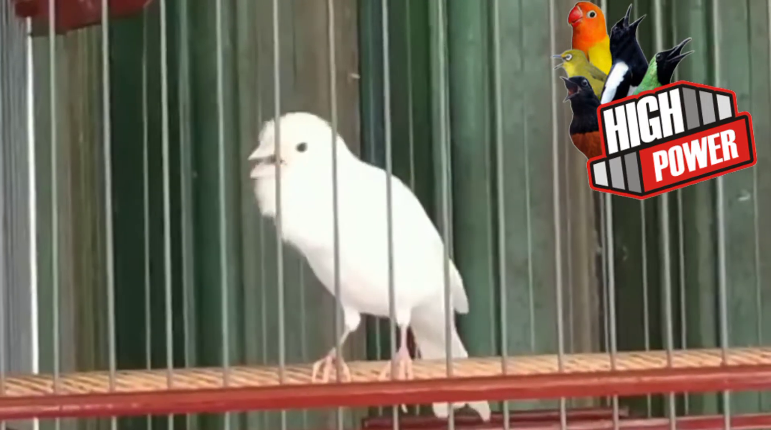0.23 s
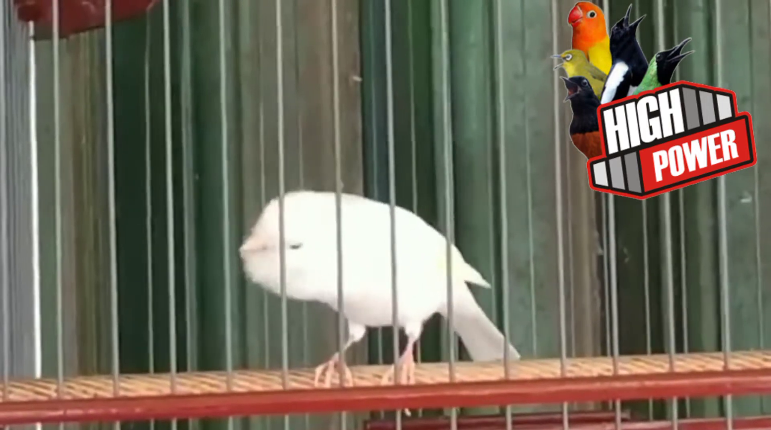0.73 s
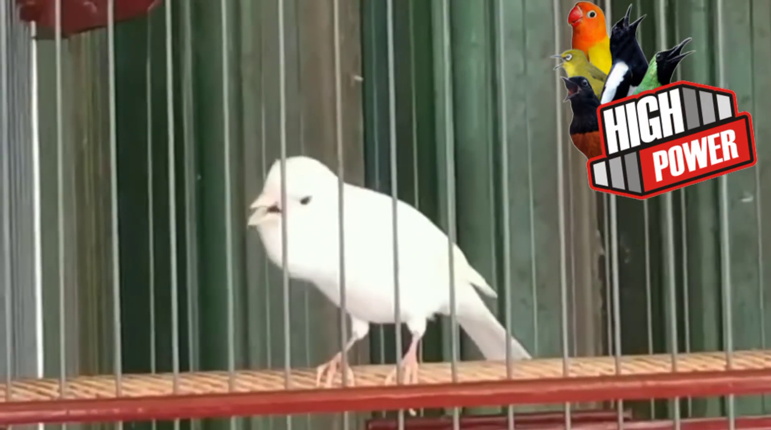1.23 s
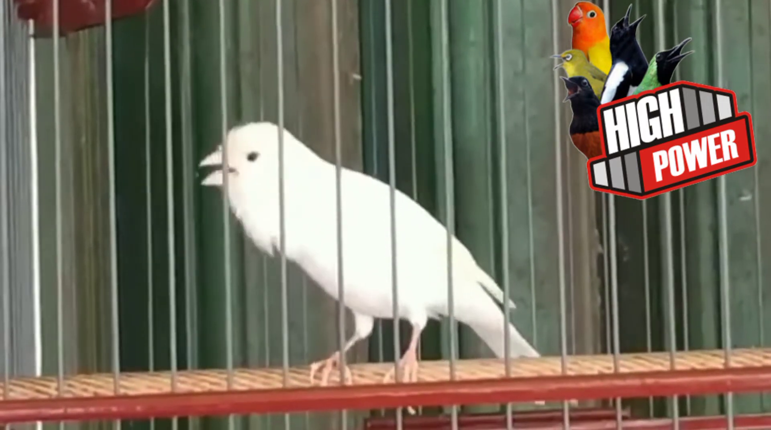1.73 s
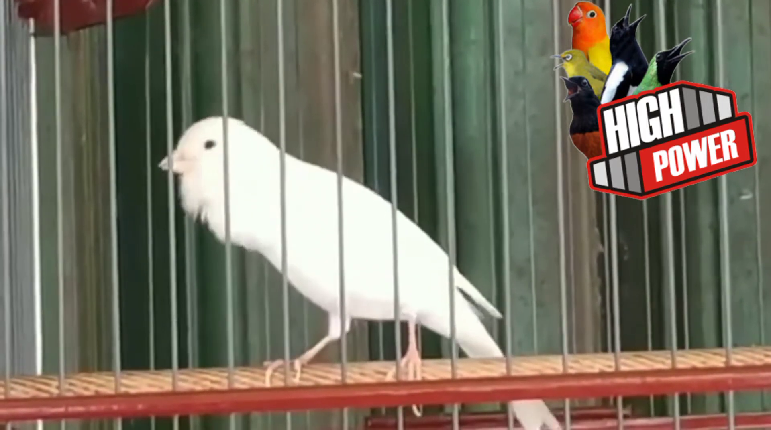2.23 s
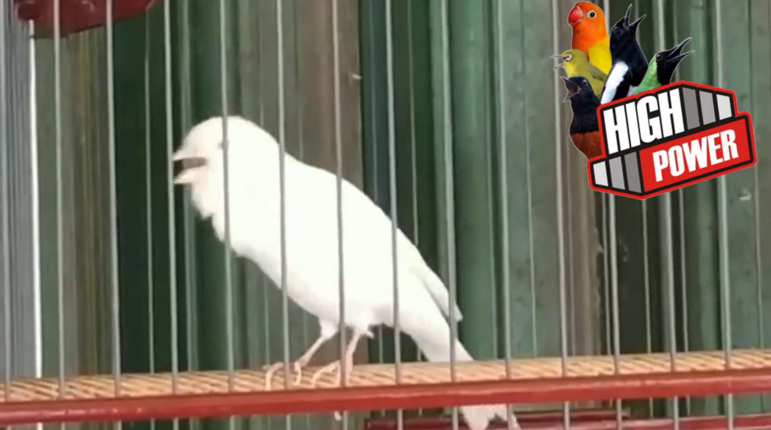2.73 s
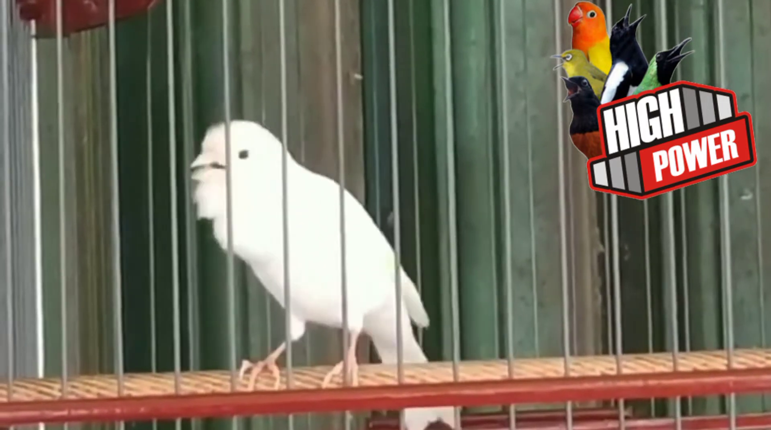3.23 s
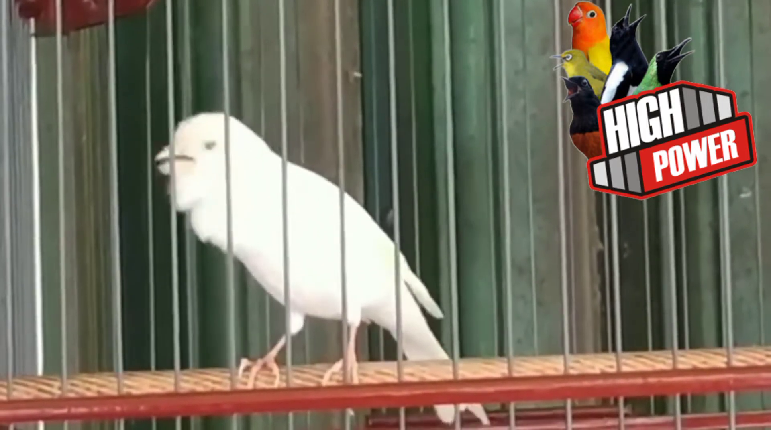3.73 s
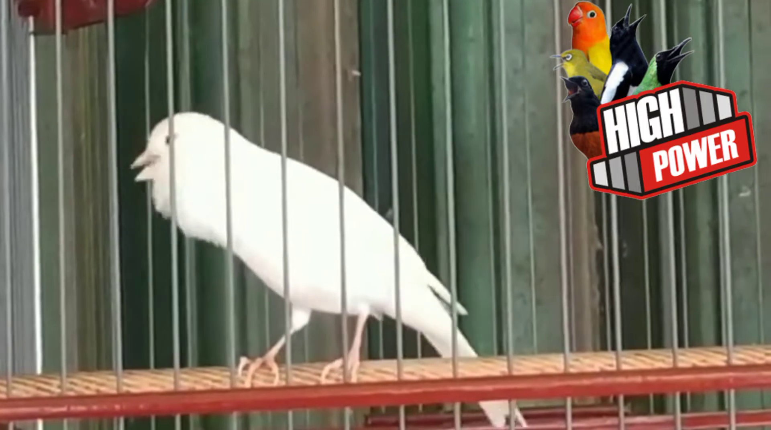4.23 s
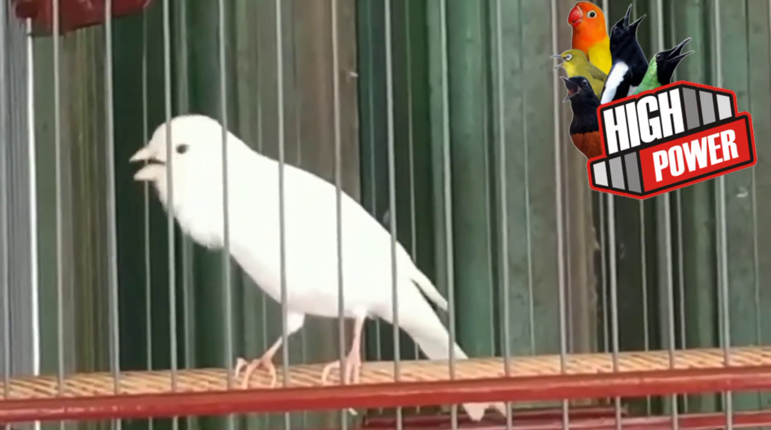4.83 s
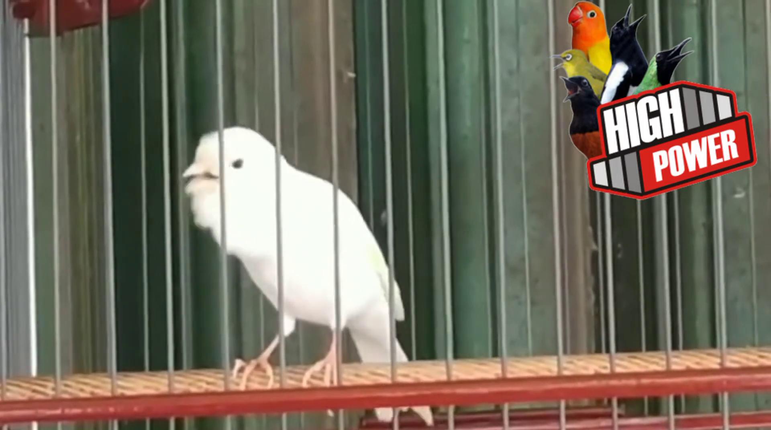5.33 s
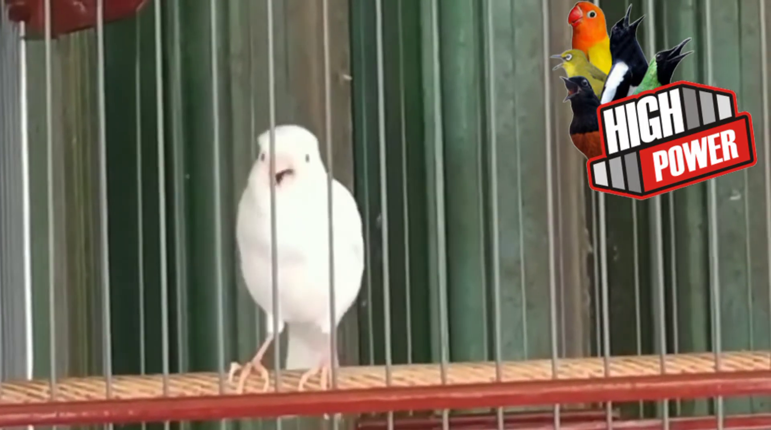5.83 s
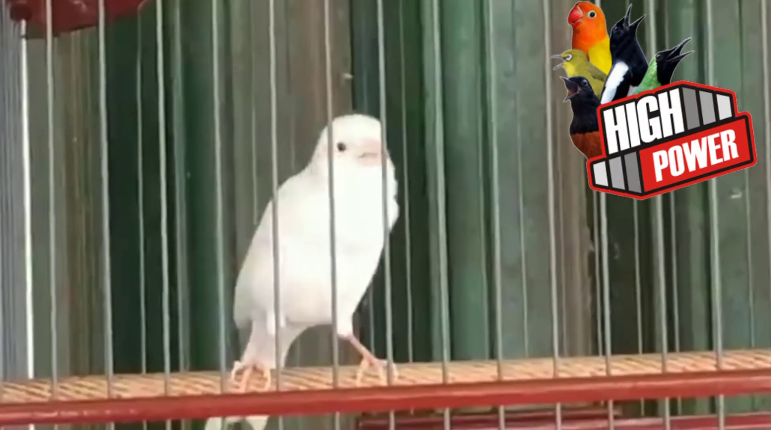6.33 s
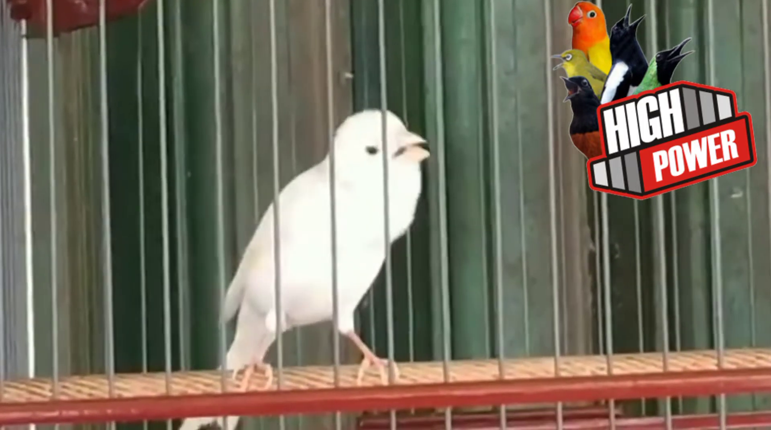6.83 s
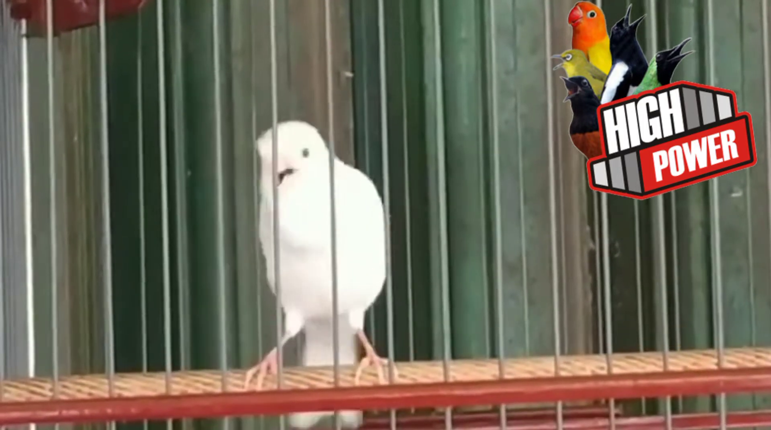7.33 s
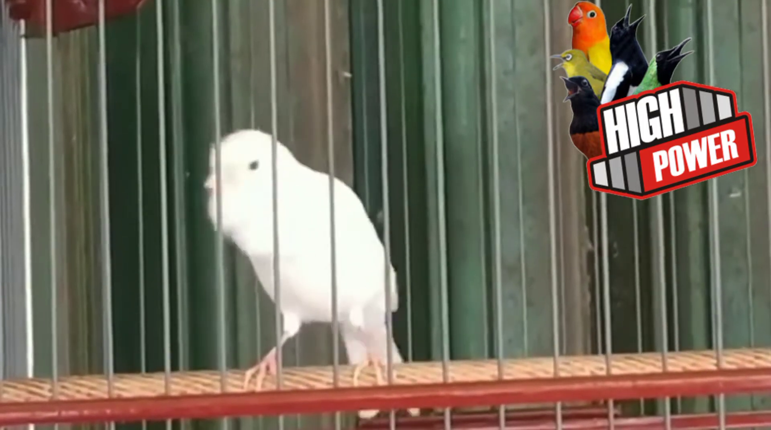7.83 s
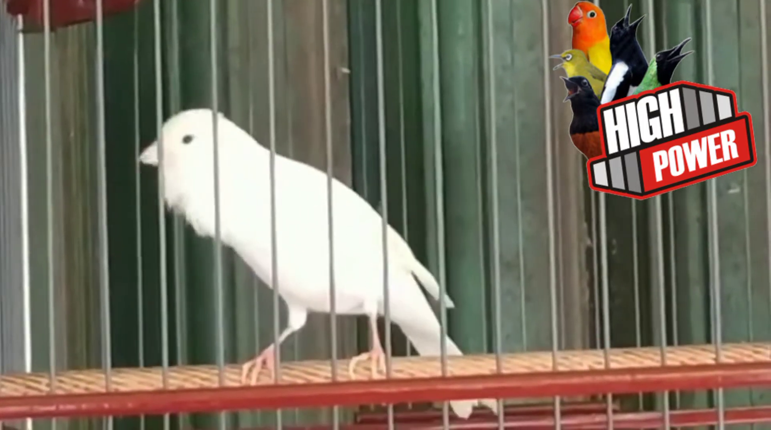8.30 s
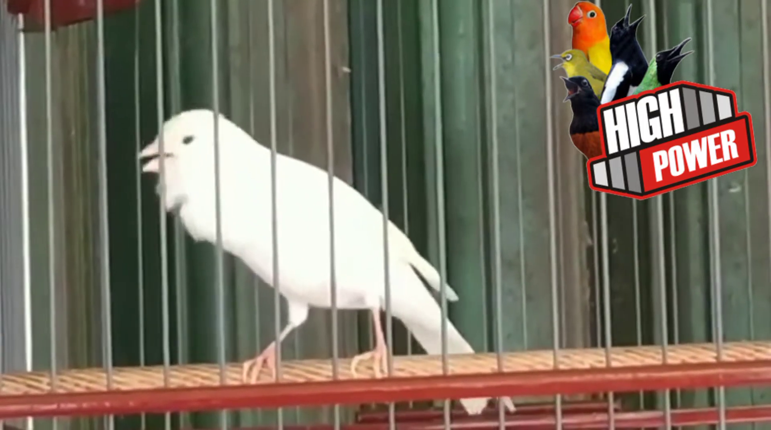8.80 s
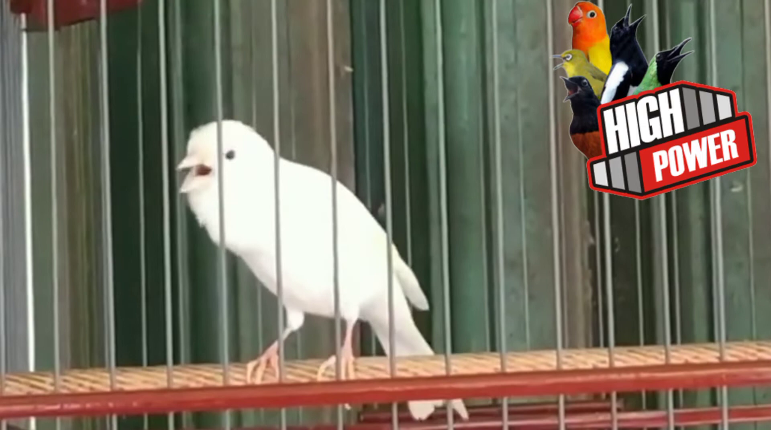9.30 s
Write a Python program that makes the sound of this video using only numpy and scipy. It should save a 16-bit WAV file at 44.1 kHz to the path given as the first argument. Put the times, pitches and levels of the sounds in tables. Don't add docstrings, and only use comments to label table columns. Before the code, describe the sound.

Bright, nearly pure canary whistles dominate, captured close in stereo with short hard-room reverberation and slight phone-recording coarseness. Each phrase repeats one syllable: falling slides, longer falls, rises, swooping drops, a rapid rolling trill, dry chatter, chips, then long falls again. Gaps are only brief. Behind it are faint rising replies and small chirps from other birds, over a steady, low traffic rumble that eases near the end.

```python
import sys
import numpy as np
from scipy import signal
from scipy.fft import rfft, irfft, next_fast_len
from scipy.io import wavfile
from scipy.ndimage import uniform_filter1d

SR = 44100
rng = np.random.default_rng(int(sys.argv[2]) if len(sys.argv) > 2 else 0)


def magnitude_from_level(level_db):
    exponent = np.asarray(level_db, float) / 20
    return 10 ** exponent


def wrap_up_sound(samples):
    columns = np.atleast_2d(samples).T
    tamed = np.clip(columns, -1, 1)
    steps = np.round(tamed * 32767).astype(np.int16)
    wavfile.write(sys.argv[1], SR, steps)


N = 421596


def on_log(table, hz):
    f, v = np.transpose(table)
    return np.interp(np.log(np.maximum(hz, 1)), np.log(f), v)


def walk(rate_hz, size=N):
    hold = int(SR / rate_hz)
    steps = np.repeat(rng.standard_normal(size // hold + 1), hold)
    return 1.25 * uniform_filter1d(uniform_filter1d(steps, hold), hold)[:size]


def wander(x, depth_db, size=4096):
    _, _, z = signal.stft(x, SR, nperseg=size)
    field = rng.standard_normal(z.shape[1:])
    field = uniform_filter1d(uniform_filter1d(field, size=2, axis=0), size=10, axis=1)
    gain = magnitude_from_level(depth_db * field / field.std())
    gain = gain / np.sqrt(np.mean(gain ** 2))
    return signal.istft(z * gain, SR, nperseg=size)[1][:, :N]


# t/s, level/dB
TRAFFIC = [
    (0.3, -37.5),
    (3.31, -39),
    (5.32, -38.5),
    (9.07, -44.5),
    (9.4, -42),
]
# f/Hz, level/dB per Hz
RUMBLE = [(12, -53), (20, -7.5), (38, 0), (59, -4), (102, 0.5), (157, -1.5), (179, -3.5), (226, -25.5),
          (260, -18), (340, -56.5), (570, -120)]
# f/Hz, level/dB per Hz
AIR = [(120, -26), (200, -2.5), (228, -4), (460, -9), (1320, -16), (1520, -11.5), (2200, -15),
       (2860, -34.5), (4840, -120)]
# f/Hz, correlation
LIKENESS = [(60, .992), (125, .975), (250, .75), (500, .35), (1500, .2)]


def background():
    air_db, gust_db = -11, 1.5
    load_db = np.interp(np.arange(N) / SR, *np.transpose(TRAFFIC)) + 1.1
    hz = np.arange(N // 2 + 1) * SR / N
    like = np.clip(on_log(LIKENESS, hz), 0, 1)
    out = 0
    for table, db, lo_hz, top_hz in [(RUMBLE, 0, 40, 220), (AIR, air_db, 250, 1200)]:
        mid, side = rfft(rng.standard_normal((2, N))) * magnitude_from_level(on_log(table, hz))
        mid, side = mid * np.sqrt(1 + like), side * np.sqrt(1 - like)
        in_band = (hz > lo_hz) & (hz < top_hz)
        rms = np.sqrt(2 * np.sum(np.abs(mid[in_band]) ** 2)) / N
        ports = irfft(np.array([mid + side, mid - side]), N) / rms
        out = out + ports * magnitude_from_level(load_db + db + gust_db * walk(6))
    return wander(out, depth_db=3.5)


# multiple, level/dB
OVERTONES = [(2, -17), (3, -19.5), (4, -23.5)]
# f/Hz, gain/dB
UPPER = [(4000, -17), (6000, -21), (7600, -6), (9000, -2.5), (10500, 3), (12500, -0.5), (13500, -10)]


def whistle(track, note, wobble, edge_s=0.0012):
    s, hz, db = note
    i = np.arange(max(int(s[0] * SR), 0), min(int(s[-1] * SR), N))
    t = i / SR
    hz = np.interp(t, s, hz) * wobble[i]
    phase = 2 * np.pi * np.cumsum(hz) / SR
    wave = np.sin(phase)
    for k, k_db in OVERTONES:
        below_nyquist = k * hz < .45 * SR
        wave += magnitude_from_level(k_db + on_log(UPPER, k * hz)) * below_nyquist * np.sin(k * phase)
    edge = np.clip(np.minimum(t - s[0], s[-1] - t) / edge_s, 0, 1)
    track[i] += wave * magnitude_from_level(np.interp(t, s, db)) * np.sin(np.pi / 2 * edge) ** 2


def glide(from_hz, to_hz, bend, size):
    along = np.expm1(-bend * np.linspace(0, 1, size)) / np.expm1(-bend)
    return from_hz + (to_hz - from_hz) * along


def aviary(count=260):
    track = np.zeros(N)
    steady = np.ones(N)
    for at, start, fall, length, loud in rng.random((count, 5)):
        s = at * N / SR + np.array([0, 0.033 + .05 * length])
        hz = (2900 + 2600 * start ** 2) * np.array([1, 1.1 - 0.46 * fall])
        whistle(track, (s, hz, np.full(2, -44 + 8 * loud)), steady, edge_s=0.0087)
    return track


# t/s, length/s, start f/Hz, end f/Hz, level/dB
ANSWERS = [
    (2.2, .2, 4330, 5000, -28),
    (3.713, 0.15, 2885, 3620, -33.5),
    (4.0, 0.11, 2900, 3350, -32.5),
    (4.3, .08, 2900, 3183, -35),
    (7.76, 0.17, 3490, 4050, -25),
    (8.03, .16, 3520, 3758, -25.5),
    (8.268, 0.16, 3527, 3704, -23.5),
    (9.036, 0.13, 4470, 4950, -27),
]
# t/s, start f/Hz, end f/Hz, level/dB
FAR_CHIRPS = [
    (8.41, 3300, 2400, -41),
    (8.54, 3400, 2300, -41),
    (8.72, 3800, 2900, -38),
    (8.80, 3600, 2300, -39),
    (8.98, 3900, 2700, -37),
    (9.08, 3400, 2200, -40),
    (9.33, 3600, 2400, -40),
]


def far_bird():
    track = np.zeros(N)
    wobble = 1 + .008 * walk(120)
    for s, length, from_hz, to_hz, db in ANSWERS:
        hz = glide(from_hz, to_hz, bend=4, size=24)
        whistle(track, (np.linspace(s, s + length, len(hz)), hz, db + 0 * hz), wobble, edge_s=.02)
    hoarse = 1 + .05 * walk(400)
    for s, from_hz, to_hz, db in FAR_CHIRPS:
        note = np.array([s, s + 0.066]), np.array([from_hz, to_hz]), np.array([db + 10, db + 3.5])
        whistle(track, note, hoarse, edge_s=0.0025)
    return track


def breath():
    low_pass = signal.butter(4, 900, fs=SR, output="sos")
    rush = signal.sosfilt(low_pass, rng.standard_normal(N))
    return magnitude_from_level(2.5 * walk(250)) + magnitude_from_level(-21) * rush / rush.std()


def syllable(strokes, size=24):
    joint_ms = 2.3
    ends = np.cumsum([0] + [row[0] for row in strokes])
    ms = np.concatenate([np.linspace(a, b, size) for a, b in zip(ends, ends[1:])])
    hz = np.concatenate([glide(a, b, bend + 1e-9, size) for _, a, b, bend, _ in strokes])
    joints = np.ravel([ends[:-1] + joint_ms / 2, ends[1:] - joint_ms / 2], order="F")
    push_db = np.repeat([row[4] for row in strokes], repeats=2)
    return ms, hz, np.interp(ms, joints, push_db)


# length/ms, start f/Hz, end f/Hz, bend, push/dB
SLIDE = [(26.93, 7500, 5800, 0.067, -5.5), (80.7, 5150, 1950, -0.36, -0.5)]
LONG_FALL = [(184.2, 7450, 4150, -.2, -1.5), (31.54, 4150, 2700, 0.12, -1.5)]
RISE = [(16.02, 2100, 2400, 0.55, -4.5), (107, 3100, 5120, .1, -8), (48.6, 5120, 5220, .6, -1.5),
        (49.9, 5220, 5300, 0.27, -5), (15, 4800, 5320, .1, -15.5)]
SCOOP = [(6.09, 4500, 7600, 2, -2), (12.07, 7600, 7400, -0.4, -9.5), (171.1, 7400, 2400, 2.5, -2),
         (25, 2400, 2400, .1, -9)]
FLICK = [(22, 7600, 6300, 0.12, -2)]
ROLL = [(12, 7450, 5900, .1, -2), (13, 5900, 4600, 0.38, -4)]
PIP = [(11, 3300, 3720, 2.9, 7.26)]
CHATTER = [(5.92, 5200, 7300, 0.9, 1), (20.14, 7300, 6500, -2.5, -4.5), (21.86, 5550, 4400, -0.14, -.5),
           (17.4, 4400, 3350, -0.5, -12.5), (12.8, 3300, 1600, -0.37, 1.5)]
CHIP = [(4.88, 5500, 6800, 1.5, -2.5), (14.06, 7400, 5950, -0.64, -7.5), (20.16, 5950, 4700, -0.6, -2.5),
        (57.75, 4700, 1800, 1.32, -1.5)]
LINK = [(45, 7650, 6100, -.3, 1), (33, 6100, 4000, .1, -3)]
# t/s, effort/dB
SLIDE_AT = [(0.038, 0.5), (0.194, 1), (0.351, 0.5), (0.512, 1), (0.669, -1), (0.818, 0.5), (0.973, -0.5)]
FALL_AT = [(1.213, -0.28), (1.472, 0.27), (1.735, -1.5), (2.004, -0.95), (2.288, -1.8)]
RISE_AT = [(2.524, 0), (2.823, 0)]
SCOOP_AT = [(3.07, 0.0026), (3.324, 0.0095), (3.568, 0), (3.821, 0), (4.07, 0), (4.335, 0)]
FLICK_AT = [(4.552, 0)]
ROLL_AT = [(4.6, -1.5), (4.678, 0.5), (4.755, 1), (4.832, 1), (4.907, 1.5), (4.982, 1), (5.062, 1),
           (5.14, 3), (5.217, 2), (5.294, 1.5), (5.371, 1.5), (5.454, 4), (5.535, 4), (5.614, 3.5),
           (5.698, 3), (5.786, 4.5)]
PIP_AT = [(4.611, -6.5), (4.691, -5), (4.769, -5.5), (4.846, -5.5), (4.921, -6), (4.998, -5), (5.074, -4.5),
          (5.155, -4.5), (5.232, -5.5), (5.307, -6.5), (5.388, -6), (5.469, -5.5), (5.552, -4), (5.63, -2),
          (5.715, -2)]
CHATTER_AT = [(5.894, 0.79), (6.004, 0), (6.114, 0.38), (6.224, 1), (6.333, 0), (6.441, 0.87), (6.554, 0),
              (6.662, 0), (6.774, 0.056), (6.884, 0.082), (6.992, 0.58), (7.107, 1)]
CHIP_AT = [(7.214, 2.6), (7.353, 1), (7.491, 1), (7.632, 1.8), (7.773, 0), (7.912, 0), (8.065, 0),
           (8.196, 0.056)]
LINK_AT = [(8.391, 0)]
LAST_FALL_AT = [(8.626, 0.14), (8.9, 1), (9.176, 1), (9.462, 0.76)]
# syllable, beats, lead before beat/ms, first length factor, last length factor, last pitch factor
PHRASES = [(SLIDE, SLIDE_AT, 40, 1.01, 0.94, 1.01), (LONG_FALL, FALL_AT, 158, .78, 1, 0.98),
           (RISE, RISE_AT, 103, 1.01, 1.01, 1), (SCOOP, SCOOP_AT, 58, 0.97, 1.01, 0.98),
           (FLICK, FLICK_AT, 16, 1.1, 1.01, 1.01), (ROLL, ROLL_AT, 23, 1.1, 1.05, 0.94),
           (PIP, PIP_AT, 3.2, 1.3, .85, 0.94), (CHATTER, CHATTER_AT, 42, 1.01, 1, 0.97),
           (CHIP, CHIP_AT, 36, .88, 1.1, 0.93), (LINK, LINK_AT, 65, 1, 1, 1),
           (LONG_FALL, LAST_FALL_AT, 158, 0.99, .96, 0.95)]
# f/Hz, level/dB
THROAT = [(1900, -36.5), (2500, -28), (3100, -15.5), (3800, -9), (5200, -9.5), (5900, -15.5), (6800, -21.5),
          (7500, -16.5)]


def canary():
    pitch_spread, length_spread = .005, .02
    track = np.zeros(N)
    wobble = 1 + 0.00367 * walk(150)
    for strokes, sung, lead_ms, first, last, pitch in PHRASES:
        ms, hz, push_db = syllable(strokes)
        along = np.linspace(0, 1, len(sung))
        chance = rng.standard_normal((len(sung), 2))
        for (beat_s, effort_db), u, (a, b) in zip(sung, along, chance):
            length = first + (last - first) * u + length_spread * a
            s = beat_s + (ms - lead_ms) * length / 1e3
            sung_hz = hz * (1 + (pitch - 1) * u + pitch_spread * b)
            db = on_log(THROAT, sung_hz) + push_db + effort_db
            whistle(track, (s, sung_hz, db), wobble)
    return track * breath() * magnitude_from_level(1.11)


# build-up/s, t60/s, level/dB, unevenness/dB
ROOM = [
    (.003, 0.09, -4, 6.0),
    (0.019, 0.452, -6.5, 1.5),
]


def echoes():
    s = np.arange(SR // 2) / SR
    out = 0
    for rise_s, t60_s, db, uneven_db in ROOM:
        taps = rng.standard_normal((2, len(s))) * magnitude_from_level(uneven_db * rng.exponential(size=(2, len(s))))
        tail = taps * (1 - np.exp(-s / rise_s)) * np.exp(-np.log(1000) * s / t60_s)
        out = out + magnitude_from_level(db) * tail / np.sqrt(np.sum(tail ** 2, axis=1, keepdims=True))
    return out


# f/Hz, gain/dB
TAIL = [(2400, 1), (3500, -1.5), (4500, -0.37), (7000, 1.5), (10000, -2), (13000, -2)]
# f/Hz, left minus right/dB
PORTS = [(2000, 2.5), (4000, 0.5), (5500, 2), (7000, 8.5), (10000, 11), (13000, 8.5)]
# f/Hz, gain/dB
CAPSULE = [(7400, 0.5), (7850, -2.5), (8250, -16), (8700, -3), (9300, 0.5), (13200, 0.5), (13500, -40)]


def scene():
    lag_samples = 1.97
    size = next_fast_len(N + SR)
    hz = np.arange(size // 2 + 1) * SR / size
    side = np.array([[1], [-1]])
    near, far, flock = canary(), far_bird(), aviary()
    delay = np.exp(-1j * np.pi * hz * side * lag_samples / SR)
    heard = rfft(near + magnitude_from_level(-1.5) * far, size) * delay
    to_room = near + magnitude_from_level(5.5) * far + magnitude_from_level(6.5) * flock
    dulling = magnitude_from_level(on_log(TAIL, hz))
    turn = 1.8 * walk(2.5)
    for share in (np.cos(turn), np.sin(turn)):
        heard = heard + rfft(to_room * share, size) * rfft(echoes(), size) * dulling
    response = magnitude_from_level(on_log(CAPSULE, hz) + side * on_log(PORTS, hz) / 2)
    return irfft(heard * response, size)[:, :N] + background()


# f/Hz, level/dB
STEP = [(600, -60), (1500, -36), (2500, -33), (5000, -26), (6000, -22), (8200, -23), (9500, -27),
        (11500, -27), (13000, -26)]
# f/Hz, level/dB
FINE = [(150, -22), (500, -6), (1500, 3), (3000, 1.5), (7000, 2.5), (9000, 5), (13000, 6)]


def coarse_rounding(x, spill_db, scatter_db, round_up, size=1024, count=16):
    k = np.arange(size) + .5
    n = np.arange(2 * size) + .5
    window = np.sin(np.pi * n / size / 2)[:, None]
    basis = window * np.cos(np.pi / size * np.outer(n + size / 2, k)) * np.sqrt(2 / size)
    basis, x = basis.astype(np.float32), x.astype(np.float32)
    blocks = np.pad(x, ((0, 0), (size, 2 * size - N % size))).reshape(2, -1, size)
    z = np.concatenate([blocks[:, :-1], blocks[:, 1:]], axis=2) @ basis
    power = (z ** 2).reshape(2, len(z[0]), -1, count).mean(axis=3)
    hz = (np.arange(size // count) + .5) * count * SR / size / 2
    own = magnitude_from_level(2 * on_log(FINE, hz)) * power
    spill = magnitude_from_level(2 * spill_db) * uniform_filter1d(power, size=5, axis=2) * (hz > 1500)
    loudest = power.max(axis=2, keepdims=True) * magnitude_from_level(2 * on_log(STEP, hz))
    step = np.sqrt(own + spill + loudest + 1e-18)
    step = np.repeat(step * magnitude_from_level(scatter_db * rng.standard_normal(power.shape)), count, axis=2)
    rounded = np.sign(z) * np.floor(np.abs(z) / step + round_up) * step
    y = rounded.astype(np.float32) @ basis.T
    return (y[:, 1:, :size] + y[:, :-1, size:]).reshape(2, -1)[:, :N].astype(float)


def top_cut(x):
    return signal.sosfilt(signal.butter(12, 14200, fs=SR, output="sos"), x)


def record(dry):
    band = signal.butter(2, [800, 2200], "band", fs=SR, output="sos")
    bend = signal.sosfilt(band, dry ** 2)
    x = np.tanh(.7 * (dry + magnitude_from_level(-17) * bend)) / .7
    x = coarse_rounding(x, spill_db=-10, scatter_db=3.5, round_up=.405)
    ceiling = .6 + .24 * np.tanh((np.abs(x) - .6) / .24)
    x = np.where(np.abs(x) > .6, np.sign(x) * ceiling, x)
    x = signal.sosfilt(signal.ellip(8, .1, 60, 13400, fs=SR, output="sos"), x)
    return top_cut(x)


dry = scene()
out = record(dry)
wrap_up_sound(out)
```